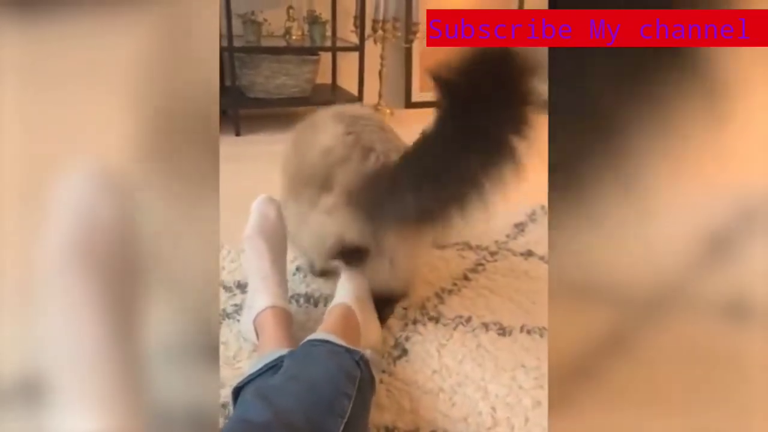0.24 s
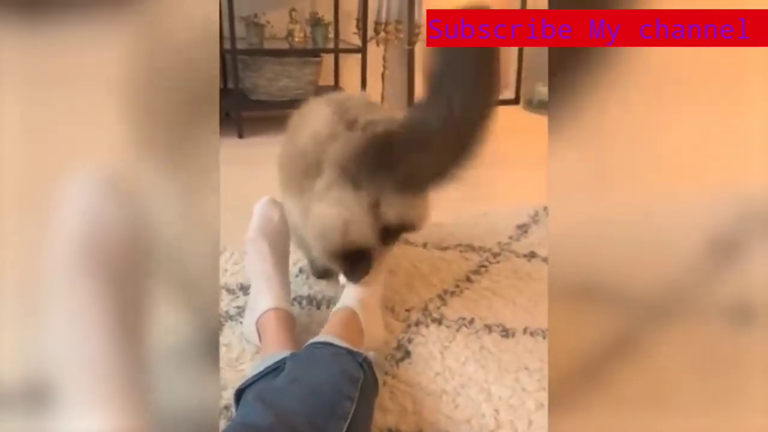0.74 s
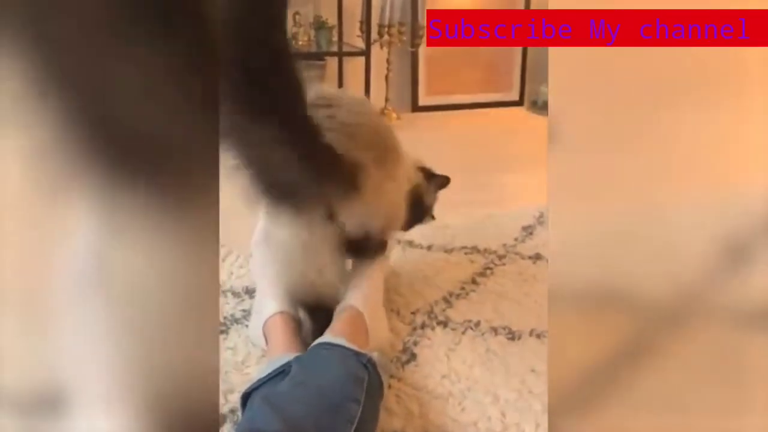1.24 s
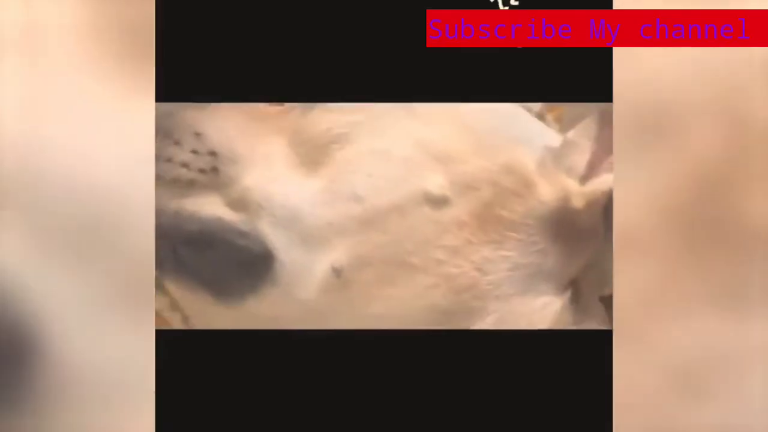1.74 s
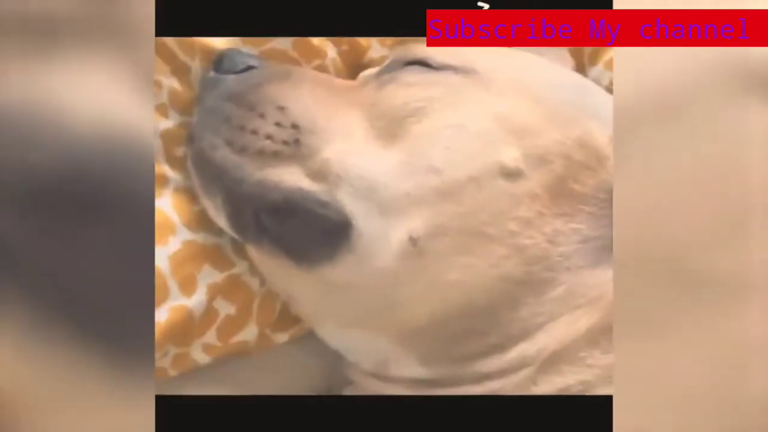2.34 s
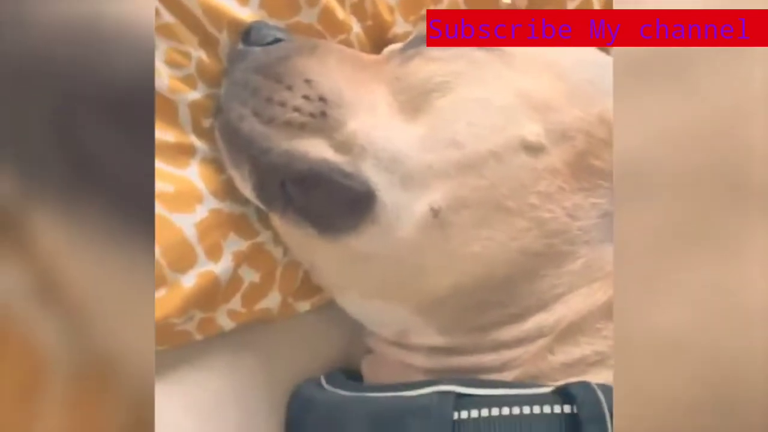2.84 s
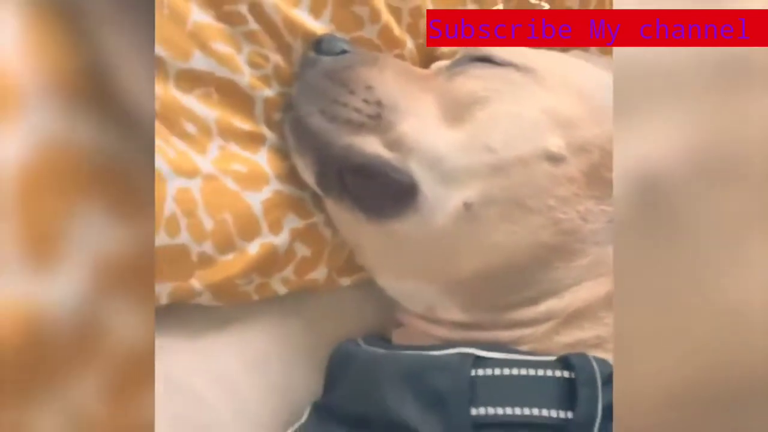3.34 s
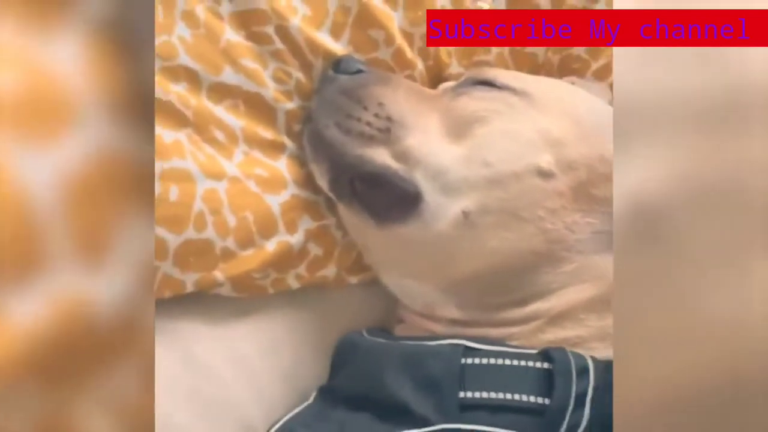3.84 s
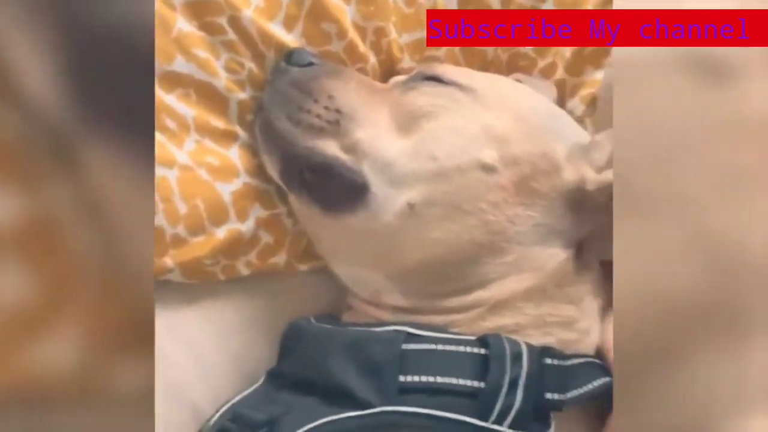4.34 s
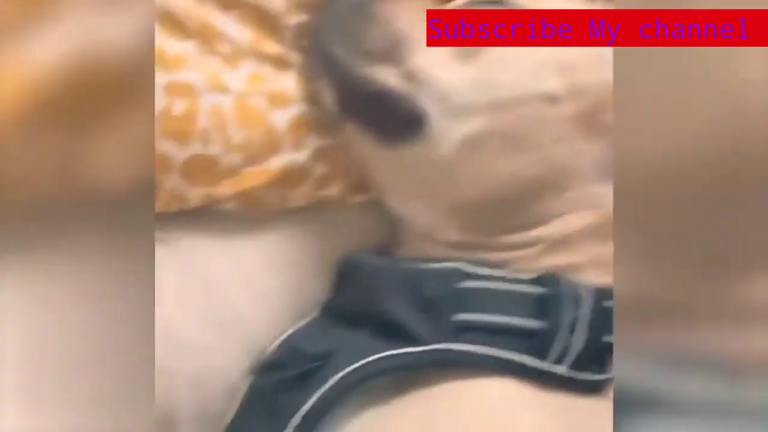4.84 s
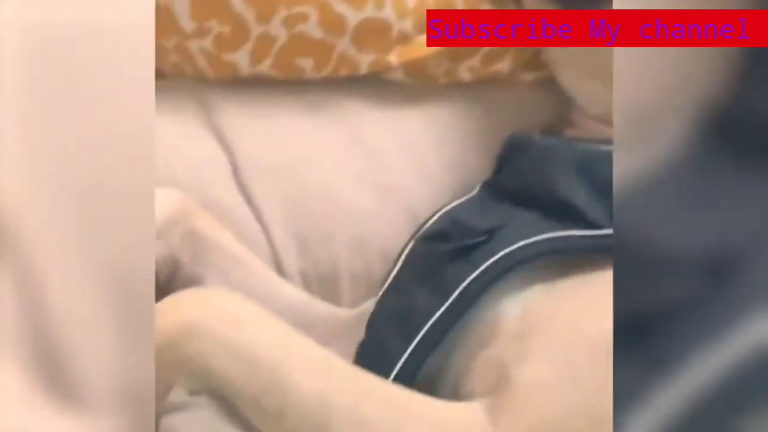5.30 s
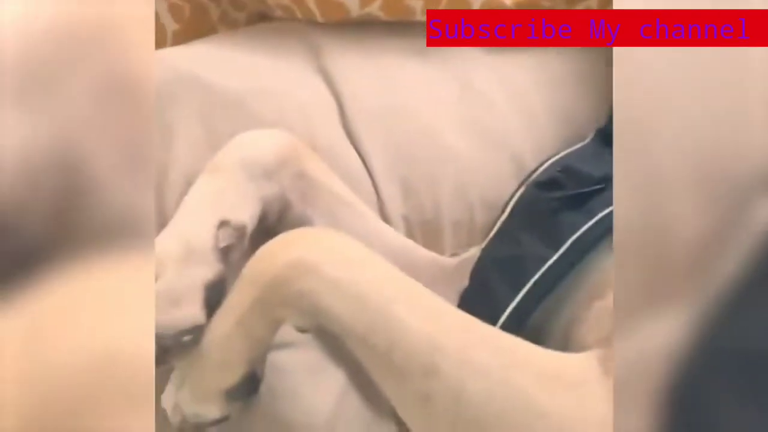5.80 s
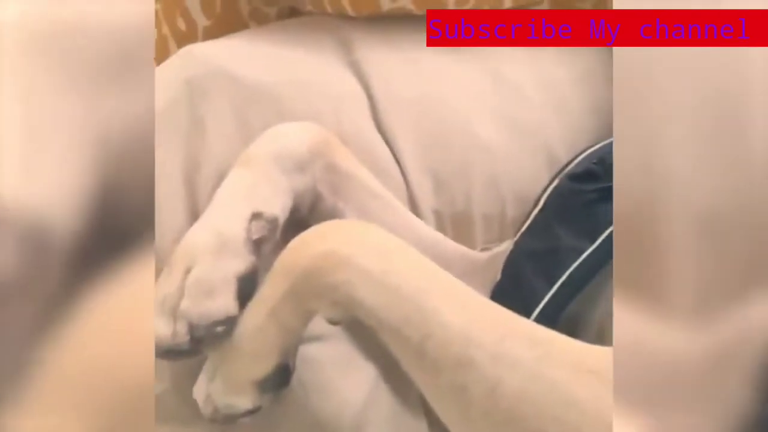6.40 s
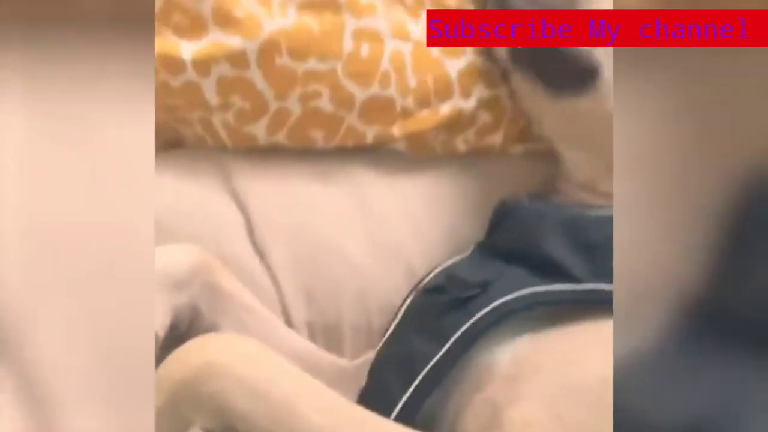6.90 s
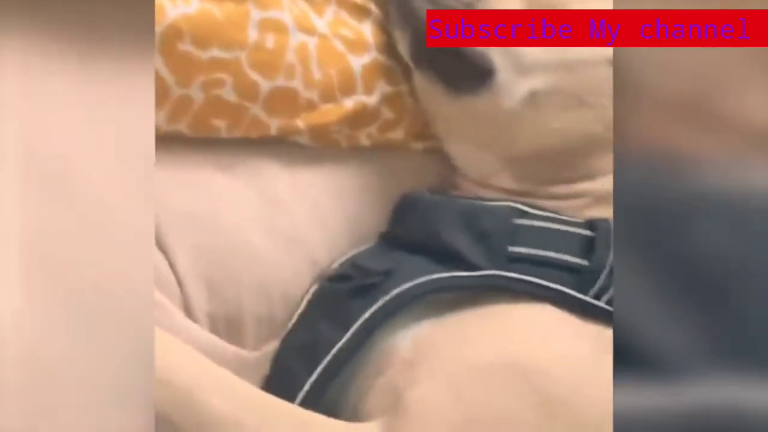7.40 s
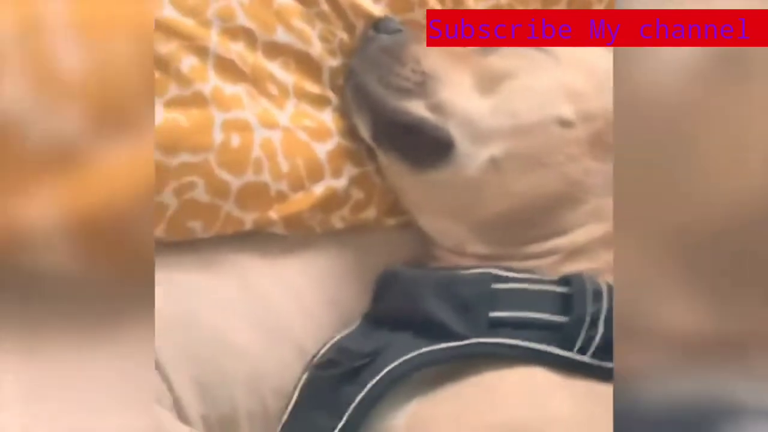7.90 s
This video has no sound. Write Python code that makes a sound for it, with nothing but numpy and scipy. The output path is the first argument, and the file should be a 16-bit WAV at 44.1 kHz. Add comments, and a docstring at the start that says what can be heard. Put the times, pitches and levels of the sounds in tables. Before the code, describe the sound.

Faint soft bumps and tiny claw scuffs in a quiet room, then abruptly a sleeping dog's close, loud, fluttering low snore, repeated after a pause.

```python
"""A cat stirs faintly on a rug in a quiet room: soft low bumps, and scuffs of filtered noise with claw ticks.
Abruptly a sleeping dog is heard close to the microphone, over room noise with a low drone and the low rumble
of the hand-held microphone. It snores twice, with a pause between: its soft palate flaps shut some 60-100
times a second, sticking now and then in the first snore, and each closure rings the throat as a falling chirp.
Air hisses through the resonances of its nose in spurts, and the hand shifts on the microphone throughout."""
import sys
import numpy as np
from scipy import signal
from scipy.fft import rfft, irfft, next_fast_len
from scipy.io import wavfile
from scipy.ndimage import map_coordinates

SR = 44100
rng = np.random.default_rng(int(sys.argv[2]) if len(sys.argv) > 2 else 0)


def dump(signal):
    """Clip the signal to [-1, 1] and save it as 16-bit WAV at the path in sys.argv[1]."""
    limited = np.clip(np.atleast_2d(signal).T, -1, 1)
    pcm = np.round(limited * 32767).astype(np.int16)
    wavfile.write(sys.argv[1], SR, pcm)


N = 359413
TIME = np.arange(N) / SR

# the spans in which the palate flaps: (start [s], end [s])
SPANS = [(1.394, 3.785), (6.179, 8.15)]


def amp(db):
    """Level to amplitude ratio: 20 dB is a factor of ten."""
    return 10 ** (np.asarray(db) / 20)


def unit(x):
    """Normalise by the root mean square, to rms 1."""
    return x / np.sqrt(np.mean(x ** 2) + 1e-20)


def along(points, hz):
    """Spectral envelope: gain interpolated in dB through (frequency [Hz], level [dB]) on a log axis."""
    f, db = np.transpose(points)
    return amp(np.interp(np.log(hz + 1), np.log(f + 1), db))


def curves(rows):
    """Piecewise-linear control: one value per sample for each column after the time."""
    s, *cols = np.transpose(rows)
    return [np.interp(TIME, s, c) for c in cols]


def per_snore(tables):
    """Slow control: join the tables of successive snores into one curve for each column."""
    return curves([row for rows in tables for row in rows])


def wobble(rate):
    """Slow random modulation: a spline through normal random knots, rate knots a second."""
    return map_coordinates(rng.standard_normal(int(N * rate / SR) + 4), [TIME * rate])


def filtered(x, response):
    """Linear filtering: multiply the spectrum of x by a response of frequency."""
    m = next_fast_len(N + SR // 2)
    return irfft(rfft(x, m) * response(np.fft.rfftfreq(m, 1 / SR)), m)[:N]


def noise(spectrum):
    """Coloured noise: white noise shaped by a spectral envelope, of rms 1."""
    return unit(filtered(rng.standard_normal(N), lambda hz: along(spectrum, hz)))


def resonances(modes, hz):
    """Modal sum: second-order resonances (centre [Hz], width [Hz], level [dB]) of alternating sign."""
    total = 0
    for k, (centre, width, db) in enumerate(modes):
        damping = 1j * hz * width
        total = total + (-1) ** k * amp(db) * damping / (centre * centre - hz * hz + damping)
    return total


def swell(t, peak_s):
    """Critically damped envelope: rises from t = 0 to 1 at peak_s and dies away."""
    u = np.maximum(t, 0) / peak_s
    return u * np.exp(1 - u)


def cat_room():
    """Ambient noise: the diffuse background of the cat's room is steady coloured noise."""
    # (frequency [Hz], density [dB per Hz])
    spectrum = [(20, -21.5), (55, -1), (110, -8.5), (170, -12.5), (260, -15.5), (345, -10.5), (420, -26.5),
                (600, -31.5), (3000, -37.5), (8000, -39.5), (15000, -36.5)]
    return amp(-52.5) * noise(spectrum)


def bumps(roundness=1.9):
    """Damped oscillation: each soft bump of paw or hand is a few low cycles that swell and fade."""
    # (time [s], envelope peak [dB], frequency [Hz], swell time [s])
    contacts = [(.0, -32, 77, 0.013), (.054, -37, 67, 0.015), (.103, -39, 62, 0.017),
                (0.699, -38, 70, 0.014), (.95, -40, 66, 0.018), (1.011, -35.5, 167, 0.0057),
                (1.075, -24, 80, 0.02), (1.144, -30, 85, 0.011), (1.187, -34.5, 85, .015),
                (1.259, -37, 69, 0.018), (3.539, -9, 70, 0.011), (3.658, -8, 65, .0042),
                (3.837, -4, 83, 0.0034), (3.87, -15, 37.6, 0.039), (4.836, -11.5, 38.2, .015),
                (4.987, -14, 85, 0.0043), (5.037, -16.5, 84, 0.0049), (6.055, -20, 54, 0.03)]
    out = np.zeros(N)
    for s, db, hz, peak_s in contacts:
        t = TIME - s
        out += amp(db) * swell(t, peak_s) ** roundness * np.sin(2 * np.pi * hz * t)
    return out


def scuffs():
    """Frictional noise: a claw ticks and brushes over the rug, followed by a duller rub."""
    # strokes: (time [s], brush peak [dB], dull rub [dB re brush], first tick [dB re brush])
    strokes = [(0.673, -58.5, 10, 6.5), (.896, -55.5, 3, 7.5)]
    # spectra of the brush and of the rub: (frequency [Hz], density [dB per Hz])
    bright_spectrum = [(300, -19), (900, -2.5), (1800, 0), (3500, -14), (7000, -10), (15000, -14)]
    dull_spectrum = [(100, -8.5), (280, -8), (550, -10), (900, -21), (2500, -40)]
    # resonances of the claw contact: (centre [Hz], width [Hz], level [dB])
    tick_modes = [(1500, 330, 0.5), (2000, 520, -2.5), (3000, 650, -8)]
    bright, dull = noise(bright_spectrum), noise(dull_spectrum)
    tick = unit(filtered(rng.standard_normal(N), lambda hz: resonances(tick_modes, hz)))
    out = np.zeros(N)
    for s, db, dull_db, tick_db in strokes:
        t = TIME - s
        first_tick = amp(tick_db) * tick * swell(t, 0.0011)
        brush = bright * swell(t, 0.0076) ** 0.14  # the small power lets the brush linger
        rub = amp(dull_db) * dull * swell(t, 0.025)
        out += amp(db) * (first_tick + brush + rub)
    return out


def dog_room(air_db=-31.0, swing_db=0.43, waver_rad=0.99):
    """Ambient noise and phase modulation: nearly steady room noise with a wavering low drone."""
    # room noise: (frequency [Hz], density [dB per Hz])
    spectrum = [(50, -9.5), (100, -2.5), (150, 0), (200, -7), (310, -2.5), (400, -12), (520, -12.5),
                (720, -22.5), (1100, -21.5), (1480, -20), (1620, -18), (1800, -22), (2400, -28.5),
                (5500, -39.5), (7500, -45), (13000, -59.5)]
    # partials of the drone: (frequency [Hz], level [dB rms])
    drone_partials = [(118.4, -40), (242.2, -42)]
    drone = np.zeros(N)
    for hz, db in drone_partials:
        phase = 2 * np.pi * hz * TIME + waver_rad * wobble(10)
        drone += amp(db) * np.sqrt(2) * np.sin(phase)
    return amp(air_db + swing_db * wobble(10.0)) * noise(spectrum) + drone


def handling(hold_db=-38):
    """Structure-borne noise: the resting hand rumbles steadily; each shift of the grip swells the rumble."""
    # shifts of the grip: (middle [s], rumble [dB], half length to 1/e [s])
    grip_shifts = [(2.938, -17.5, 0.025), (3.238, -23.5, 0.046), (3.56, -20.5, 0.26), (3.891, -18, 0.085),
                   (4.096, -27.5, 0.027), (4.859, -23.5, 0.074), (5.03, -27, .06), (5.484, -27, 0.077),
                   (5.809, -25, 0.034), (5.935, -26, .03), (6.094, -19, 0.055), (6.27, -24, .04),
                   (6.447, -17.5, 0.051), (6.64, -25.5, .07), (7.385, -16.5, 0.047), (7.56, -25.5, .06),
                   (7.927, -28.5, 0.044), (8.122, -22, .04)]
    # rumble: (frequency [Hz], density [dB per Hz])
    spectrum = [(12, -32.5), (24, -9.5), (36, -0.5), (55, -2.5), (80, -6.5), (120, -14), (300, -87)]
    shifts = sum(amp(db) * np.exp(-((TIME - s) / half_s) ** 2) for s, db, half_s in grip_shifts)
    return (amp(hold_db) + shifts) * noise(spectrum)


def closures(effort_db, scatter_db=0.5, spurt_db=0.9):
    """Relaxation oscillation: each closure gives a kick and a spurt; weak pull is uneven, a wait builds pressure."""
    # the palate sticks between flaps: (sticks [s], snaps free [s])
    stalls = [(1.653, 1.671), (1.765, 1.783), (1.896, 1.906), (2.066, 2.076), (2.303, 2.318),
              (2.336, 2.344), (2.444, 2.455), (2.46, 2.479), (2.877, 2.891), (2.896, 2.917), (3.422, 3.439),
              (3.444, 3.473), (3.478, 3.496), (3.77, 3.781)]
    # it moves between a fast and a slow register; a curve per snore: (time [s], flap rate [Hz])
    flap_rate = [
        [(1.52, 70.2), (1.57, 85.1), (1.72, 104.3), (1.87, 102.2), (2.09, 91.26), (2.11, 83.1), (2.23, 81.6),
         (2.25, 93.3), (2.44, 98.8), (2.48, 62.2), (2.56, 101.2), (2.6, 97.9), (2.68, 83.45), (2.86, 93.5),
         (2.92, 76.8), (2.99, 83.7), (3.02, 95.9), (3.3, 93.1), (3.335, 79.1), (3.39, 77.9), (3.48, 61),
         (3.63, 61.25), (3.67, 68.8), (3.79, 59.2)],
        [(6.17, 84.2), (6.38, 81.02), (6.52, 66.85), (6.68, 74.37), (6.85, 62.4), (6.965, 66.9), (6.995, 90.9),
         (7.04, 87.3), (7.085, 64.65), (7.135, 90.38), (7.4, 91.13), (7.79, 88.56), (7.84, 83.9), (8.14, 77.94)],
    ]
    full_db = -14  # effort of a full snore
    uneven_s, uneven_grows = .00009, 0.84  # timing scatter at full effort; growth, dB per dB of effort lost
    waver, waver_knots = .008, 24.91  # random swing of the rate at full effort (share); knots per second
    usual_gap_s, pressure_grows = .012, 0.3  # usual time between flaps; power of the wait in a spurt

    unsteady = amp(uneven_grows * (full_db - effort_db))
    rate = per_snore(flap_rate)[0] * (1 + waver * unsteady * wobble(waver_knots))
    free = sorted([s for s, _ in SPANS] + [s for _, s in stalls])
    stuck = sorted([s for _, s in SPANS] + [s for s, _ in stalls])
    at = []
    for start, end in zip(free, stuck):
        first = int(start * SR)
        cycles = np.cumsum(rate[first:int(end * SR)]) / SR
        # one closure at each whole cycle
        at.extend(first + np.searchsorted(cycles, np.arange(cycles[-1])))
    late, size, spurt = rng.standard_normal((len(at), 3)).T
    delay = np.round(late * uneven_s * unsteady[at] * SR).astype(int)
    moved = np.clip(at + delay, 0, N - 1)
    wait_s = np.diff(at, prepend=0) / SR
    pressure = np.minimum(wait_s / usual_gap_s, 2) ** pressure_grows
    kicks = np.bincount(moved, amp(scatter_db * size), N)
    spurts = np.bincount(moved, pressure * amp(spurt_db * spurt), N)
    return kicks, spurts


def flap_ring(first_period=0.00113, stretch=0.76, peak_s=0.005, sharpness=1.31):
    """Falling chirp: a flap rings the throat with a period growing from first_period by stretch seconds a second."""
    t = np.arange(SR // 25) / SR
    cycles = np.log1p(stretch * t / first_period) / stretch
    return np.sin(2 * np.pi * cycles) * swell(t, peak_s) ** sharpness


def flutter(kicks, inside, split_hz=310):
    """Excitation and response: kicks ring the throat, split into soft body and snap, each of unit deviation."""
    # spectral envelopes: (frequency [Hz], gain [dB])
    body_tone = [(30, -5.5), (65, 3.5), (95, -0.5), (180, 4.5), (260, 2.5)]
    snap_tone = [(300, -4), (450, 6.0), (600, 0.5), (800, -4), (1500, -12.0)]

    def low(hz):
        """Crossover: the share of the gain that passes below split_hz."""
        return 1 / (1 + (hz / split_hz) ** 8)

    train = signal.fftconvolve(kicks, flap_ring())[:N]
    body = filtered(train, lambda hz: along(body_tone, hz) * low(hz))
    snap = filtered(train, lambda hz: along(snap_tone, hz) * (1 - low(hz)))
    return body / np.std(body[inside]), snap / np.std(snap[inside])


def nasal_air(kicks, rebound=0.48, rebound_s=0.0066, broad=0.051):
    """Modulated turbulence: air spurts at each closure, weaker on the rebound, and the nose resonates."""
    # the passage changes shape as each breath builds:
    # (time [s], [resonances (centre [Hz], width [Hz], level [dB])])
    shapes = [(1.9, [(3200, 290, -1.5), (3860, 430, -1), (5300, 350, -6), (6170, 340, -7)]),
              (3.2, [(3250, 240, 0), (4700, 170, -3), (5680, 200, -3.5)]), (3.7, [(3100, 130, 0),
              (3970, 260, 1), (5100, 300, -5)]), (6.6, [(3230, 340, 1.5), (4970, 240, -0.5),
              (5700, 190, 1.5)]), (7.5, [(3180, 240, 0), (4700, 340, -1.5), (5780, 770, -7.5)]),
              (7.95, [(3110, 170, 2.5), (4636, 120, 5.5), (5540, 500, -8.5)])]
    # turbulence at the palate: (frequency [Hz], density [dB per Hz])
    turbulence = [(500, -34.5), (1000, -13), (1700, 1.5), (2500, -4.5), (3200, -10), (6300, -10),
                  (6900, -12), (10000, -16), (14000, -27)]
    leak, spurt_s, uneven_db = .24, .0012, 1.1  # steady flow; half width of a spurt to 1/e; random swing
    t = np.arange(-SR // 100, SR // 100) / SR
    spurt = np.exp(-(t / spurt_s) ** 2) + rebound * np.exp(-((t - rebound_s) / spurt_s) ** 2)
    flow = leak + signal.fftconvolve(kicks, spurt, "same") * amp(uneven_db * wobble(80))
    jets = noise(turbulence) * flow
    times = [s for s, _ in shapes]
    out = np.zeros(N)
    for (_, modes), here in zip(shapes, np.eye(len(shapes))):
        # each shape of the passage fades into the next
        shaped = unit(filtered(jets, lambda hz: broad + np.abs(resonances(modes, hz))))
        out += np.interp(TIME, times, here) * shaped
    return out


def snores(body_db=1.5, snap_db=-1.0, air_db=-2.5, fade_s=0.024):
    """Flow-induced vibration: two long breaths set the palate flapping, while air hisses through the nose."""
    # pull of the breath, a curve per snore: (time [s], effort [dB], snap of the closure [dB re effort])
    effort = [
        [(1.42, -26.5, -13.5), (1.55, -29, -11.5), (1.88, -18.5, -19), (1.91, -20.5, -11.5), (1.94, -18, -23),
         (2.17, -19, -11.5), (2.87, -16, -10), (2.91, -18.5, -6.5), (3.03, -15, -11), (3.33, -15, -12.5),
         (3.43, -17, -8), (3.72, -14.5, -11), (3.78, -19.5, -10.5)],
        [(6.18, -27, -14), (6.494, -21, -11), (6.782, -20, -9.5), (6.82, -22, -9), (7.428, -14.5, -13),
         (7.89, -14.5, -10.5), (8.13, -13.5, -10.5)],
    ]
    # air through the nose before the air_db trim, a curve per snore: (time [s], level [dB])
    nasal = [
        [(1.42, -52), (1.7, -47), (2.74, -47), (3.34, -43), (3.38, -45), (3.71, -48.5), (3.74, -54.5)],
        [(6.15, -58), (6.402, -53.5), (6.424, -46.5), (7.082, -49), (7.158, -54), (7.462, -48), (8.13, -44)],
    ]
    # short wet puffs in the nose: (time [s], peak level [dB])
    puffs = [(3.774, -42.5), (6.635, -46.5)]
    puff_s = .003  # rise of a puff
    effort_db, snap_rel = per_snore(effort)
    kicks, spurts = closures(effort_db)
    gate = sum(np.clip(1 + np.minimum(TIME - start, end - TIME) / fade_s, 0, 1) for start, end in SPANS)
    body, snap = flutter(kicks, gate > .5)
    throat = amp(effort_db) * (amp(body_db) * body + amp(snap_rel + snap_db) * snap)
    air = amp(per_snore(nasal)[0] + air_db)
    air = air + sum(amp(db) * swell(TIME - s, puff_s) for s, db in puffs)
    return gate * (throat + air * nasal_air(spurts))


def scene():
    """Superposition: sources add; the quiet room with the cat gives way at once to the sleeping dog."""
    dog_start = 1.394  # the moment from which the dog is heard (s)
    cat = cat_room() + scuffs()
    dog = dog_room() + handling() + snores()
    return (np.where(TIME < dog_start, cat, dog) + bumps())[None]


def record(dry):
    """Band limiting: the recorder keeps nothing from 15500 Hz upwards."""
    return filtered(dry[0], lambda hz: hz < 15500)[None]


dry = scene()
out = record(dry)
dump(out)
```